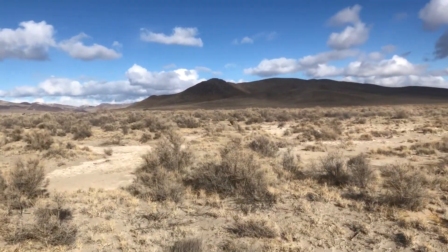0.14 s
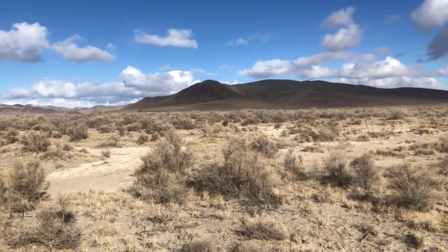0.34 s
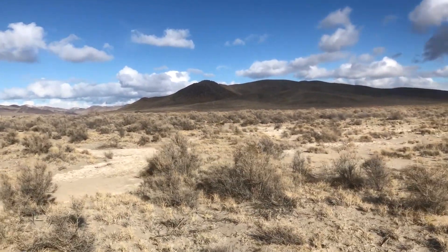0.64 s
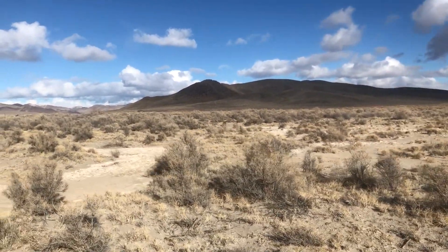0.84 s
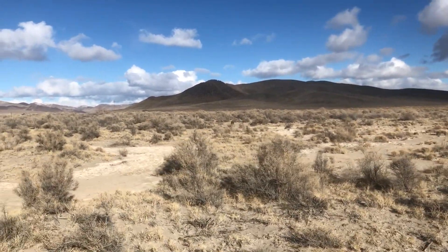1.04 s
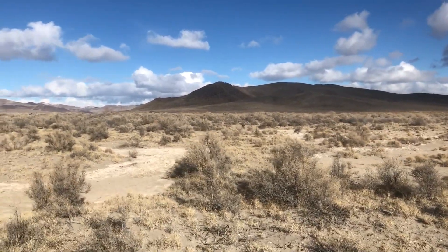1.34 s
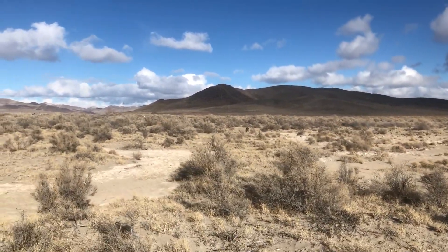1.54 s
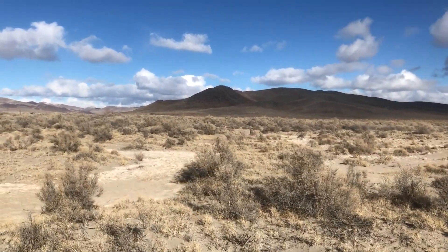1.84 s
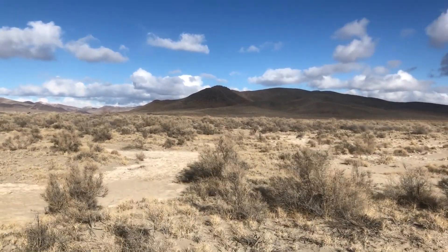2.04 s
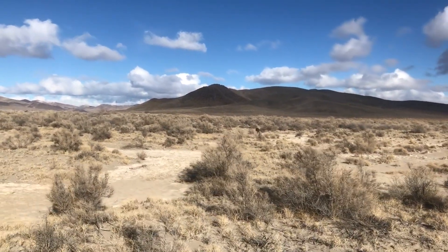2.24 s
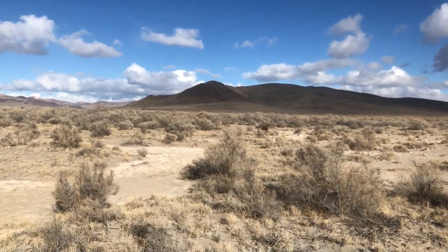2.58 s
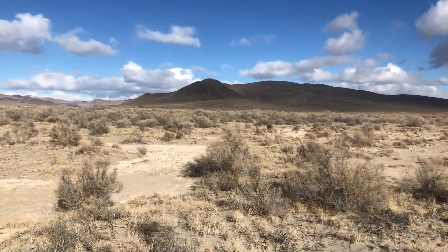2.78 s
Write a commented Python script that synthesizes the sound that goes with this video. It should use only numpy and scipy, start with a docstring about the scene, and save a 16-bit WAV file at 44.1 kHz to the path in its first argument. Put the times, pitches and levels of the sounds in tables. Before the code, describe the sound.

Wind buffets the microphone in open dry scrubland, with low rumble, hollow flutter and scattered dull pops from the start. It builds to the heaviest thumps and dense crunching bursts around 1.0-1.5 s, dips near 1.6, then continues unevenly with gusts near 2.1 and 2.4, fading almost quiet by 2.75. Very faint brush ticks near 0.5, 1.9 and 2.4 and a soft rustle at 2.6 sit over thin hiss.

```python
"""A low rumble, a dull flutter and irregular crunching pops of gusty wind on a microphone in open desert scrub;
far fainter, dry brush rustles and ticks over a thin hiss.
Turbulence is coloured noise under level curves, large eddies are short sine swings, pops are spikes smeared
by random delays. Brush is swelling high noise and decaying narrow-band ticks; the hiss is steady noise."""
import sys
import numpy as np
from scipy import signal
from scipy.fft import rfft, irfft
from scipy.io import wavfile
from scipy.ndimage import uniform_filter1d

SR = 44100
rng = np.random.default_rng(int(sys.argv[2]) if len(sys.argv) > 2 else 0)


def int16_out(signal):
    """Quantize to a 16-bit WAV file."""
    q = np.round(np.clip(np.atleast_2d(signal).T, -1, 1) * 32767)
    wavfile.write(sys.argv[1], SR, q.astype(np.int16))


N = 130095


def undb(db):
    """Decibels are logarithmic: convert them to an amplitude gain."""
    return 10 ** (np.asarray(db) / 20)


def unit(x):
    """Normalise the mean power: scale to rms 1."""
    return x / np.sqrt(np.mean(x ** 2))


def clock():
    """Sampling: the time of every sample in seconds."""
    return np.arange(N) / SR


def curve(table):
    """Amplitude envelope: a gain interpolated in decibels through (time_s, level_db) points."""
    times_s, levels_db = np.array(table).T
    return undb(np.interp(clock(), times_s, levels_db))


def colour(x, points):
    """Spectral shaping: weight x by (frequency_hz, level_db) points on a log-frequency axis, at rms 1."""
    hz, db = np.array(points).T
    f = np.maximum(np.fft.rfftfreq(N, 1 / SR), 1)
    gain = undb(np.interp(np.log(f), np.log(hz), db))
    return unit(irfft(rfft(x) * gain, N))


def smooth(x, seconds):
    """Gaussian low-pass: a moving average whose bell has this standard deviation."""
    f = np.fft.rfftfreq(N, 1 / SR)
    return irfft(rfft(x) * np.exp(-.5 * (2 * np.pi * f * seconds) ** 2), N)


def steady(x, seconds):
    """Envelope division: even out swells of a noise that are slower than the given time."""
    local_power = np.abs(smooth(x ** 2, seconds))
    return x / np.sqrt(local_power + 1e-9)


def noise():
    """White noise: equal mean power at all frequencies."""
    return rng.standard_normal(N)


def buffeting():
    """Turbulent pressure at the port: deep rumble, a hollow body, and small eddies in quick spurts."""
    # spectral density of each part: frequency_hz, level_db (relative, per Hz)
    rumble_colour = [(20, -30), (32, -3.5), (46, 3), (65, 11), (95, 8.5), (140, 2.5), (200, -8.5),
                     (400, -79.5)]
    body_colour = [(70, -22.5), (125, -1), (170, 1), (270, 0), (380, -8.5), (550, -22), (900, -40.5),
                   (2000, -75.5)]
    flutter_colour = [(150, -14), (300, 2.5), (450, 8), (650, 2.5), (900, -11.5), (1300, -25), (2000, -45),
                      (3000, -55.5), (6000, -90)]
    # gusting level of each part, before its trim: time_s, level_db
    rumble_levels = [(0, -38), (.2, -35.5), (.29, -31), (.36, -36.5), (.44, -31), (.56, -33), (.74, -34),
                     (.83, -34.5), (.92, -32), (1.0, -26.5), (1.1, -27.5), (1.2, -23.5), (1.35, -31),
                     (1.54, -26.5), (1.59, -36.5), (1.65, -30), (1.72, -30.5), (1.8, -31), (2.02, -31.5),
                     (2.22, -35), (2.29, -28), (2.42, -29), (2.6, -37), (2.68, -41), (2.76, -50),
                     (2.86, -41), (2.94, -33.5)]
    body_levels = [(0, -42), (.2, -37.5), (.3, -36), (.38, -36), (.47, -34), (.54, -44), (.66, -33),
                   (.76, -37), (.89, -43), (1.0, -35), (1.17, -33.5), (1.35, -34), (1.53, -34), (1.59, -44),
                   (1.66, -37.5), (1.74, -38.5), (2.0, -37.5), (2.25, -40), (2.37, -34.5), (2.52, -33.5),
                   (2.555, -44), (2.69, -35.5), (2.75, -47), (2.86, -45.5), (2.95, -44)]
    flutter_levels = [(0, -36), (.12, -41), (.24, -38.5), (.42, -42.5), (.54, -47), (.66, -44), (.76, -44),
                      (.84, -38.5), (.9, -53.5), (.94, -40), (1.0, -37), (1.1, -30.5), (1.35, -35.5),
                      (1.53, -43.5), (1.585, -53.5), (1.64, -29), (1.7, -54), (1.85, -39.5), (1.9, -48.5),
                      (2.0, -37.5), (2.27, -51.5), (2.37, -30), (2.51, -55), (2.56, -55.5), (2.68, -38),
                      (2.73, -58), (2.87, -67), (2.95, -52)]
    rumble_trim_db, body_trim_db, flutter_trim_db = -0.5, 2.5, -2.5
    flicker_hz, flicker_db = 88, 8  # the flicker's amplitude falls to 1/e^2 here; rms swing before evening

    rumble = steady(colour(noise(), rumble_colour), seconds=0.016) * curve(rumble_levels)
    body = steady(colour(noise(), body_colour), seconds=0.02) * curve(body_levels)
    flicker = unit(smooth(noise(), 1 / (np.pi * flicker_hz)))
    spurts = undb(flicker_db * flicker)
    flutter = steady(colour(noise() * spurts, flutter_colour), seconds=0.0093) * curve(flutter_levels)
    return undb(rumble_trim_db) * rumble + undb(body_trim_db) * body + undb(flutter_trim_db) * flutter


def thumps():
    """Pressure swing of a large eddy: a sine at random phase under a bell only a cycle or two long."""
    # large slow eddies: time_s, level_db (before the trim), pitch_hz
    large_eddies = [(0.241, -37.5, 267), (0.258, -21, 163), (0.276, -19.5, 236), (0.313, -19.5, 156),
                    (0.436, -17, 103), (0.464, -17, 152), (0.652, -19, 155), (0.696, -21, 120),
                    (0.731, -16.5, 110), (0.789, -20, 166), (0.851, -25.5, 156), (0.936, -17, 166),
                    (1.036, -13.5, 122), (1.094, -11.5, 108), (1.131, -18, 150), (1.173, -14, 129),
                    (1.188, -8.5, 120), (1.223, -17.5, 140), (1.258, -17, 140), (1.275, -18.5, 210),
                    (1.312, -19.5, 130), (1.343, -15.5, 110), (1.39, -18, 250), (1.418, -23.5, 130),
                    (1.446, -26, 156), (1.647, -20, 140), (1.664, -19, 120), (1.719, -30, 237),
                    (1.788, -24, 188), (1.925, -20, 119), (1.997, -22, 129), (2.129, -19.5, 136),
                    (2.18, -25.5, 260), (2.333, -21, 218), (2.514, -20, 248), (2.82, -25, 186)]
    bell_cycles, trim_db = 0.51, -1.5  # standard deviation of the bell; common level change
    out, t = np.zeros(N), clock()
    phases = rng.random(len(large_eddies))  # in cycles
    for (at, db, hz), phase in zip(large_eddies, phases):
        cycles = (t - at) * hz
        bell = np.exp(-.5 * (cycles / bell_cycles) ** 2)
        out += undb(db + trim_db) * bell * np.sin(2 * np.pi * (cycles + phase))
    return out


def pops(size=2048, count=3):
    """Dispersed impulse: random delays smear a pressure spike and its wake; a tighter eddy reaches higher."""
    # eddies bursting on the port: time_s, level_db (before the trim),
    # roll_off_hz (above the knee the spectrum falls by 1/e every so many Hz)
    bursting_eddies = [(0.053, -37.5, 168), (0.0697, -31.5, 373), (0.1086, -28.5, 190), (0.1275, -34, 140),
                       (0.1395, -32, 252), (0.1493, -30.5, 170), (0.1716, -42.5, 310), (0.213, -44, 220),
                       (0.233, -31, 265), (0.2407, -30, 215), (0.2456, -29.5, 150), (0.2746, -31, 125),
                       (0.298, -36.5, 238), (0.3454, -40, 195), (0.3686, -38, 172), (0.406, -30.5, 195),
                       (0.5649, -43.5, 222), (0.6518, -37, 159), (0.661, -36.5, 170), (0.7051, -36.5, 140),
                       (0.777, -27.5, 279), (0.7932, -40.5, 255), (0.8096, -40.5, 130), (0.839, -39, 205),
                       (0.928, -29.5, 172.5), (0.933, -26.5, 191), (0.9519, -35.5, 254), (0.9652, -29, 180),
                       (1.0182, -32, 174), (1.0311, -36, 174), (1.0552, -40, 205), (1.071, -26.5, 245),
                       (1.0801, -22.5, 226), (1.09, -28.5, 298), (1.1014, -24, 263), (1.1133, -26, 420),
                       (1.1278, -30, 470), (1.1288, -27, 149), (1.1312, -28, 436), (1.1627, -24.5, 215),
                       (1.179, -28, 288), (1.193, -36.5, 230), (1.2249, -33.5, 360), (1.2298, -38, 360),
                       (1.232, -34.5, 340), (1.2449, -24, 319), (1.2473, -27.5, 180), (1.2725, -34, 150),
                       (1.2772, -33.5, 185), (1.301, -32, 253), (1.3136, -29, 238), (1.328, -36.5, 190),
                       (1.3385, -34.5, 180), (1.3438, -35, 209), (1.3533, -28, 190), (1.3714, -36.5, 278),
                       (1.383, -29.5, 130), (1.3852, -39, 328), (1.3924, -30.5, 145), (1.4102, -35, 169),
                       (1.4249, -36, 206), (1.4422, -28.5, 180), (1.482, -32.5, 220), (1.5078, -26, 230),
                       (1.528, -28.5, 137), (1.5312, -24.5, 276), (1.5335, -38, 367), (1.6353, -27, 268),
                       (1.647, -33.5, 215), (1.6561, -32.5, 225), (1.679, -38, 200), (1.7163, -39, 400),
                       (1.7183, -29.5, 164), (1.7624, -33.5, 141), (1.7819, -32, 168), (1.8048, -33.5, 260),
                       (1.8466, -45, 340), (1.8495, -32, 199), (1.8566, -31.5, 169), (1.9199, -37.5, 150),
                       (1.9525, -35.5, 190), (1.974, -43, 342), (1.978, -34, 230), (1.992, -44, 270),
                       (2.008, -26.5, 188), (2.0395, -33, 138.6), (2.048, -34, 245), (2.0628, -34.5, 189),
                       (2.067, -35.5, 230), (2.109, -24.5, 172), (2.1196, -28, 218), (2.163, -32, 147),
                       (2.1773, -37.5, 270), (2.1795, -29.5, 168), (2.2045, -30, 151), (2.2545, -35, 170),
                       (2.325, -33.5, 252), (2.3297, -29, 161), (2.334, -34.5, 280), (2.3683, -25, 224),
                       (2.391, -26.5, 282), (2.454, -34.5, 220), (2.4789, -32, 195), (2.512, -31, 140),
                       (2.598, -39.5, 171), (2.6722, -35, 158)]
    trim_db, core_hz = -0.4, 453  # the level counts only what lies above core_hz
    smear_s, lead_s = 0.00065, 0.00074  # spread of the delays; the spike leads the listed time
    bass_hz, knee_hz = 177, 560
    grain_hz, ripple_db, even_hz = 401, 2.5, 635  # bump spacing, depth, and width over which they average out
    shed_gap_s, shed_db, shed_roll_hz = 0.0018, -3, 1010  # wake: median gap, step in level, extra dullness
    # thin crack on top: base level, roll-off at which it has that level, roll-off as a multiple of the pop's
    crack_db, crack_roll_hz, crack_reach = -38, 296, 3.63

    out, f = np.zeros(N + 2 * size), np.fft.rfftfreq(size, 1 / SR)
    low_cut = (1j * f / (1j * f + bass_hz)) ** 4
    draws = rng.standard_normal(size=(len(bursting_eddies), 4, 64))
    for (at, db, roll_hz), chance in zip(bursting_eddies, draws):
        lag, ripple = (np.interp(f / grain_hz, np.arange(len(row)), row) for row in chance[:2])

        # weaker eddies shed after the spike, each with a random phase in cycles
        delays = np.cumsum(shed_gap_s * np.exp(chance[2, :count] / 2))
        shed = np.zeros(len(f), dtype=complex)
        for k, (delay, phase) in enumerate(zip(delays, chance[3, :count])):
            shed += undb(shed_db * (k + 0.5)) * np.exp(-2j * np.pi * (f * delay + phase))
        wake = 1 + np.exp(-f / shed_roll_hz) * shed

        fall = (np.hypot(f, knee_hz) - knee_hz) / roll_hz
        crack = undb(crack_db) * (roll_hz / crack_roll_hz) ** 2 * np.exp(-fall / crack_reach)
        shape = np.exp(-fall) + crack

        bumps = wake * undb(ripple_db * ripple)
        bumps = bumps / np.sqrt(uniform_filter1d(np.abs(bumps) ** 2, int(even_hz / f[1])))

        # phase is the running integral of delay over frequency
        smear = np.exp(-2j * np.pi * np.cumsum(smear_s * lag) * f[1])
        burst = shape * bumps * low_cut * smear
        core = irfft(burst * (f > core_hz))
        strength = np.sqrt(np.sum(core ** 2) / (.004 * SR))  # rms as if spread over 4 ms
        start = int((at - lead_s) * SR) + size // 2
        out[start:start + size] += np.fft.fftshift(irfft(burst)) * undb(db + trim_db) / strength
    return out[size:size + N]


def brush():
    """Friction and brittle impact: dry stems rustle in short swells and tick with a brief high ring."""
    # brush rustling: time_s, length_s (standard deviation of the swell), level_db
    rustles = [(0.438, 0.018, -77), (1.038, 0.013, -76.5), (1.59, 0.045, -78.5), (1.837, 0.031, -79),
               (2.567, 0.023, -77.5), (2.644, 0.037, -73.5), (2.926, .03, -80)]
    # spectral density of the rustle: frequency_hz, level_db (relative, per Hz)
    rustle_colour = [(3000, -18), (7000, -9), (9500, -3.5), (11700, 1), (13500, -6.5), (16000, -11.5)]
    # dry twigs ticking: time_s, level_db (before halving), ring_hz, decay_s (to 1/e)
    ticks = [(.069, -63, 11260, 0.0022), (0.5073, -53.5, 8150, 0.0043), (.5165, -56, 8600, 0.0038),
             (1.879, -53.5, 11500, 0.0013), (2.341, -69, 8300, .008), (2.4203, -57.5, 12500, 0.0015),
             (2.433, -65, 12500, .003), (2.452, -61.5, 8200, .005), (2.921, -65, 11000, .002)]
    tick_width_hz, splash_db = 1400, 0.5  # ring's full width at half amplitude; scratch relative to ring

    t, f = clock(), np.fft.rfftfreq(N, 1 / SR)
    scratch = colour(noise(), rustle_colour)
    swells = sum(undb(db) * np.exp(-.5 * ((t - at) / length) ** 2) for at, length, db in rustles)
    out = scratch * swells
    spray = rfft(noise())
    for at, db, hz, decay in ticks:
        resonance = 1 / (1 + (2 * (f - hz) / tick_width_hz) ** 2)
        ring = unit(irfft(spray * resonance, N))
        envelope = (t >= at) * np.exp(-np.abs(t - at) / decay)
        out = out + .5 * undb(db) * envelope * (ring + undb(splash_db) * scratch)
    return out


def hiss():
    """Stationary noise: a thin background of constant mean power and fixed colour."""
    # spectral density of the hiss: frequency_hz, level_db (relative, per Hz)
    hiss_colour = [(100, 6), (1500, 4.5), (2500, -1), (4000, -4), (7000, -6.5), (9000, -5.5), (11800, -3),
                   (13500, -16), (16000, -16)]
    return undb(-74) * colour(noise(), hiss_colour)


def scene():
    """Superposition: wind on the microphone, brush and hiss add, with no echo in the open."""
    return (buffeting() + thumps() + pops() + brush() + hiss())[None]


def record(dry):
    """Band limiting: the recorder cuts the top with a steep low-pass; the sound eases in and out."""
    edge_s, top_hz = .003, 15700
    t = clock()
    nearness = np.minimum(np.minimum(t, t[-1] - t) / edge_s, 1)
    ease = np.sin(np.pi / 2 * nearness) ** 2
    low_pass = signal.ellip(8, .2, 70, top_hz, fs=SR, output="sos")  # .2 dB ripple, 70 dB rejection
    return signal.sosfilt(low_pass, ease * dry)


dry = scene()
out = record(dry)
int16_out(out)
```